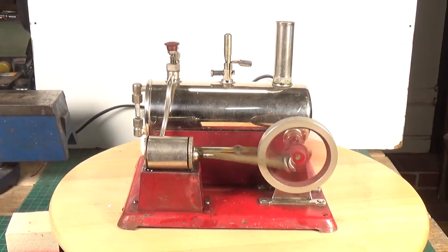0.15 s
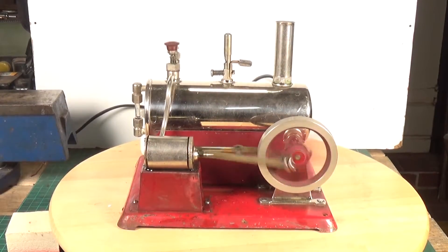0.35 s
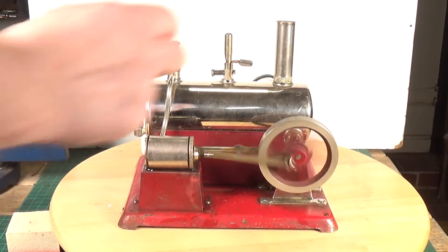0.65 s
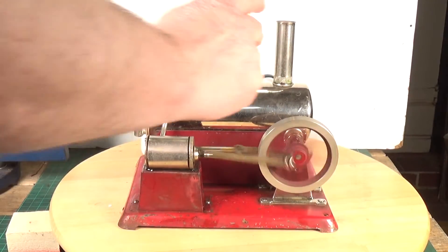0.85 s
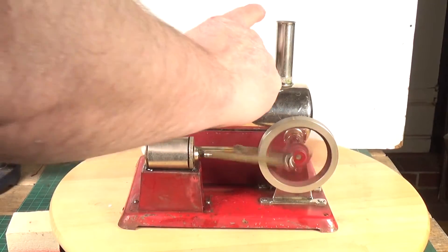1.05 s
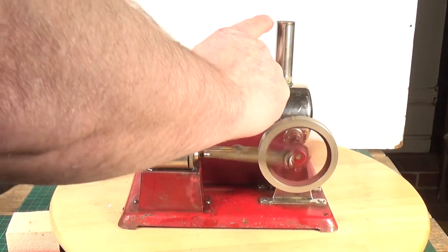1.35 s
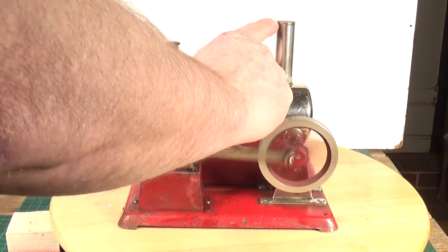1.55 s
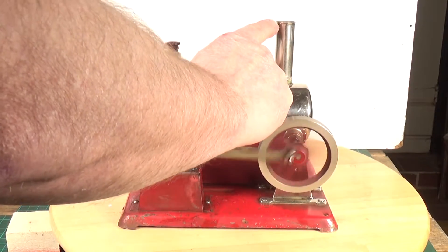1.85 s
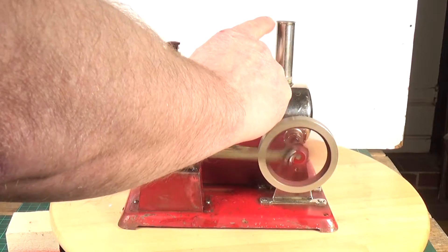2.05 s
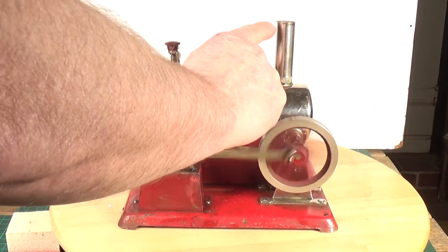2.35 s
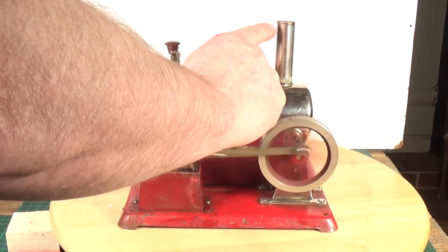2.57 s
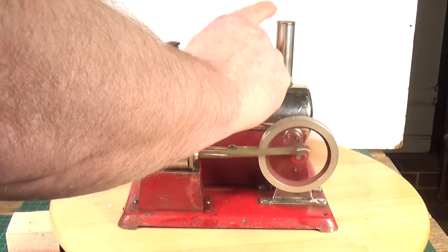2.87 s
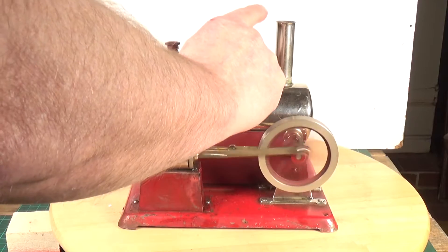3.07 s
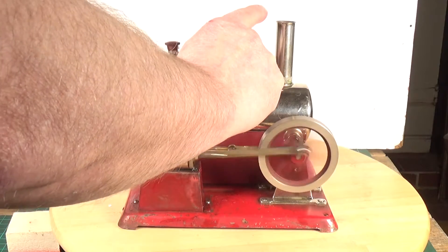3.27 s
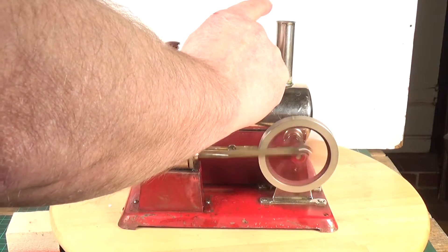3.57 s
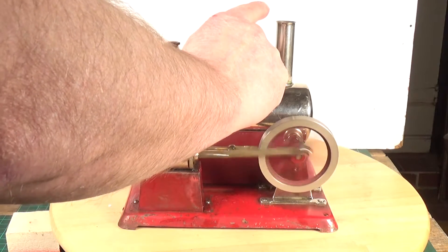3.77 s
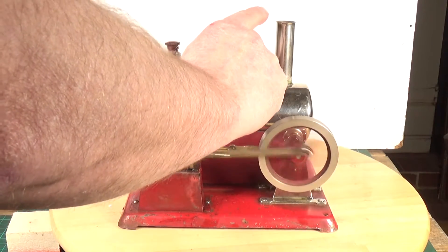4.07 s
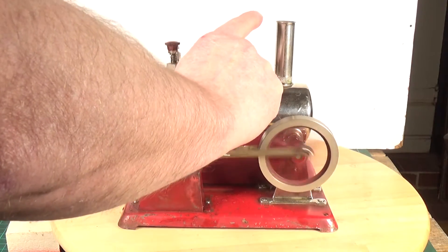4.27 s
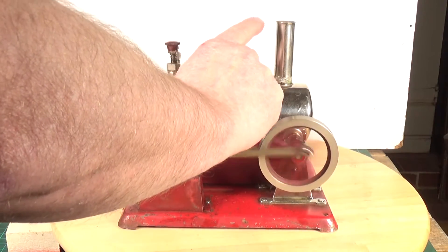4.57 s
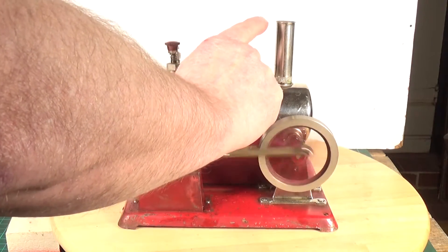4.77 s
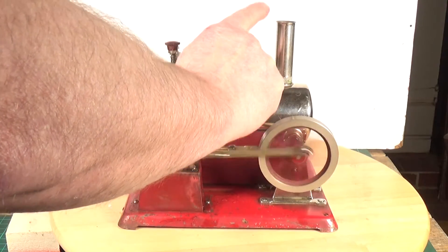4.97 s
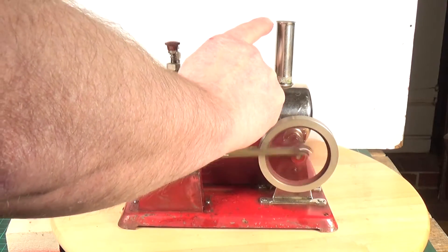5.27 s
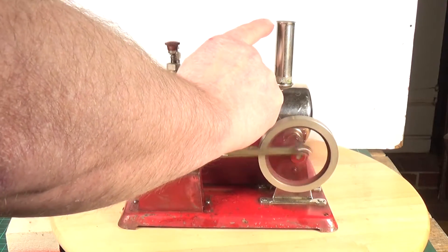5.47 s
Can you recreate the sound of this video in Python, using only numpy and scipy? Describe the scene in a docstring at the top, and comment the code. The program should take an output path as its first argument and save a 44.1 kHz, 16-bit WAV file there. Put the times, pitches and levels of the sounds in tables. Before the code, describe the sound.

A model steam engine runs close to the microphone on a wooden table in a workshop, knocking, rattling and puffing about ten times a second. At about 1.4 seconds its whistle gives a loud shrill toot, then a weaker, fluttering one. After a stretch of engine alone comes a brief hiss without tone, then another strong toot near the end.

```python
"""A small stationary steam engine runs at about ten turns a second on a wooden turntable in a workshop.
Each turn the rod knocks and bounces, the table thumps, steam puffs and the stroke reverses with a rattle.
Knocks and thumps are short pushes that set ringing parts going; puffs and whirr are coloured noise.
A hand opens the whistle valve four times: three toots, each a near sine with hissing steam, and one mere hiss."""
import sys
import numpy as np
from scipy import signal
from scipy.fft import rfft, irfft
from scipy.io import wavfile
from scipy.ndimage import uniform_filter1d, minimum_filter1d

SR = 44100
rng = np.random.default_rng(int(sys.argv[2]) if len(sys.argv) > 2 else 0)


def dump(signal):
    """Clip the signal to [-1, 1] and save it as 16-bit WAV at the path in sys.argv[1]."""
    limited = np.clip(np.atleast_2d(signal).T, -1, 1)
    pcm = np.round(limited * 32767).astype(np.int16)
    wavfile.write(sys.argv[1], SR, pcm)


def volts(x):
    """Linear amplitude factor 10**(x/20) for a level x in dB, scalar or array-like."""
    e = np.asarray(x, float) / 20
    return 10 ** e


N = 248277
T = np.arange(N) / SR

# When the rod knocks, at every fifth turn of the crank. Each entry: time in seconds.
FIFTH_KNOCKS = [0.038, 0.5389, 1.0344, 1.5305, 2.0269, 2.526, 3.0257, 3.524, 4.0204, 4.5171, 5.0187, 5.5224,
                6.026]
# How the engine frame and boiler ring. Each row: pitch in Hz, relative level in dB, time to fall 60 dB in s.
FRAME_MODES = [(461.3, -12, 0.053), (599, -6, 0.025), (703.3, -10, 0.079), (810.7, -2, 0.062),
               (894.3, -10, 0.086), (974.6, -4, 0.058), (1100, -8, 0.07), (1198, -5, 0.055),
               (1313, -12.5, 0.1), (1790, -5, 0.017), (2107, -12, 0.074), (2389, -5, 0.019),
               (2947, -18.5, 0.072), (3440, -19.5, 0.11), (4093, -22.5, 0.095), (4460, -17, 0.17)]
# How the bell-like part rings. Each row: pitch in Hz, relative level in dB, time to fall 60 dB in s.
BELL_MODES = [(1531.5, 3, 0.039), (1725, -16, 0.11)]
# How the small loose joints ring. Each row: pitch in Hz, relative level in dB, time to fall 60 dB in s.
LINK_MODES = [(4700, -3, .015), (5050, -1, .018), (5500, -3, .012), (6000, -3, .012), (6600, -4, .01),
              (7400, -6, .01)]


def colour(points, size=N):
    """Noise of rms 1 with the given spectrum: rows of Hz and dB, joined on a log pitch scale."""
    hz, db = np.transpose(points)
    f = np.fft.rfftfreq(size, 1 / SR) + 1
    shape_db = np.interp(np.log(f), np.log(hz), db, -80 + db[0], -80)
    x = irfft(rfft(rng.standard_normal(size)) * volts(shape_db), size)
    return x / x.std()


def walk(rate):
    """A smooth random wander: levels held 1 / rate s and smoothed twice, with a spread near 1."""
    hold = int(SR / rate)
    steps = np.repeat(rng.standard_normal(N // hold + 1), hold)
    return 1.46 * uniform_filter1d(uniform_filter1d(steps, hold), hold)[:N]


def dull(x, hz):
    """One-pole low-pass: takes away what is faster than hz."""
    p = np.exp(-2 * np.pi * hz / SR)
    return signal.lfilter([1 - p], [1, -p], x)


def band(x, lo_hz):
    """High-pass: small things radiate no deep bass."""
    return signal.sosfilt(signal.butter(3, lo_hz, "high", fs=SR, output="sos"), x)


def turns(lag=0., jitter=.001):
    """The moment in every turn that lies lag s after the knock, with a random jitter in s."""
    s = np.interp(np.arange(57) / 5, np.arange(len(FIFTH_KNOCKS)), FIFTH_KNOCKS)
    return s + lag + jitter * rng.standard_normal(len(s))


def uneven(s, db, scatter_db, curve=None):
    """A level for each event: the usual one, chance and, if given, a slow curve."""
    slow_db = np.interp(s, *np.transpose(curve)) if curve else 0
    return db + scatter_db * rng.standard_normal(len(s)) + slow_db


def blows(s, db):
    """One impulse for each time."""
    i = np.round(np.asarray(s) * SR).astype(int)
    ok = (i >= 0) & (i < N)
    return np.bincount(i[ok], (volts(db) * np.ones(len(i)))[ok], N)


def fade(x, t60, rise=0.00029):
    """Each impulse becomes an envelope with a quick rise and an exponential fall (both in s)."""
    p, q = np.exp(-np.log(1000) / (t60 * SR)), np.exp(-1 / (rise * SR))
    return signal.lfilter([1 - q], [1, -q], signal.lfilter([1], [1, -p], x))


def shove(s, db, push_ms):
    """Smooth pushes of a given length; a longer push sounds lower."""
    push = np.hanning(int(push_ms * SR / 1000))
    return np.convolve(blows(s, db), push / push.sum())[:N]


def ring(x, modes):
    """Damped modes struck by x, neighbours in opposite sense."""
    out = 0
    for k, (hz, db, t60) in enumerate(modes):
        r, w = np.exp(-np.log(1000) / (t60 * SR)), 2 * np.pi * hz / SR
        mode = signal.lfilter([0, r * np.sin(w)], [1, -2 * r * np.cos(w), r * r], x)
        out = out + (-1) ** k * volts(db) * mode
    return out


def chatter(spread_db):
    """Dense tiny contacts of very uneven size."""
    return rng.standard_normal(N) * volts(spread_db * rng.exponential(size=N) - spread_db)


def workshop(x, t60, wet_db):
    """Adds a diffuse room tail that builds up over its first 15 ms."""
    t = T[:SR // 2]
    tail = rng.standard_normal(len(t)) * np.exp(-np.log(1000) * t / t60) * np.clip(t / 0.015, 0, 1)
    return x + volts(wet_db) * signal.fftconvolve(x, tail / np.sqrt(np.sum(tail ** 2)))[:N]


def whirr():
    """Bearings, boiler and room murmur on as coloured noise, loudest around the knock."""
    # Spectrum of the murmur. Each row: pitch in Hz, level in dB.
    murmur_spectrum = [(20, -33), (55, -4.5), (80, -38), (100, -4), (190, -8.5), (232, 1), (400, -4.5),
                       (990, 0), (1400, -0.5), (1930, -7), (2770, -13), (6570, -13.5), (10800, -18.5),
                       (15600, -35)]
    turn_count = 5 * np.interp(T, FIFTH_KNOCKS, np.arange(len(FIFTH_KNOCKS)))
    load_db = 2.5 * np.cos(2 * np.pi * turn_count)
    return colour(murmur_spectrum) * volts(-39.5 + load_db + 1.2 * walk(29.69))


def jet():
    """Steam hisses from the open valve and breathes through the whistle mouth."""
    # Spectrum of the hiss. Each row: pitch in Hz, level in dB.
    hiss_spectrum = [(1500, -11.5), (3000, -1.5), (4800, -0.5), (5350, 2.5), (5800, -3), (8000, -10.5),
                     (9400, -2), (9900, -3), (10900, 2.5), (12200, -3), (13600, -6), (14350, -6),
                     (14900, -9), (15750, -10)]
    # Spectrum of the breath in the whistle mouth. Each row: pitch in Hz, level in dB.
    mouth_spectrum = [(2300, -30), (3020, -15), (3240, 0), (3380, -4), (3520, 0), (3850, -7), (4070, -4),
                      (4350, -15), (5000, -22), (5380, -13), (5800, -24)]
    # The four valve openings. Each row: opens in s, starts to shut in s, hiss level in dB,
    # mouth level in dB, change of the mouth level while open in dB, opening time in s.
    valve = [(1.44, 2.09, -33, -32.5, -10, 0.019), (2.346, 2.829, -38.5, -34.5, 3.5, 0.016),
             (4.581, 4.987, -41.5, -37, 5.5, 0.03), (5.242, 5.704, -33.5, -27.5, -13, 0.023)]
    hiss = colour(hiss_spectrum) * volts(1.4 * walk(25))
    mouth = colour(mouth_spectrum) * volts(2.0 * walk(150))
    out = 0
    for opens, shuts, hiss_db, mouth_db, swell_db, open_s in valve:
        flow = np.clip(np.minimum((T - opens) / open_s, (shuts - T) / 0.033 + 1), 0, 1)
        progress = np.clip((T - opens) / (shuts - opens), 0, 1)
        breath = volts(mouth_db + swell_db * progress) * mouth
        out = out + flow * (volts(hiss_db) * hiss + breath)
    return out


def whistle():
    """A near sine with faint overtones; the unsteady jet shakes its pitch and size, most in toot two."""
    # Course of each toot, one list per toot. Each row: time in s, pitch in Hz, level in dB.
    toots = [
        [(1.451, 3390, -29), (1.459, 3347, -17), (1.481, 3552, -1.5), (1.513, 3562, -5.5), (1.733, 3598, -3.5),
         (2.0, 3574, -7.5), (2.094, 3597, -1), (2.102, 3370, -19), (2.112, 3330, -30)],
        [(2.358, 3250, -32), (2.372, 3368, -17), (2.418, 3433, -11), (2.444, 3442, -22), (2.456, 3430, -17.5),
         (2.612, 3483, -18), (2.828, 3428, -23.5), (2.842, 3390, -32.5), (2.94, 3410, -42)],
        [(5.252, 3471, -55), (5.26, 3456, -16.5), (5.272, 3533, -7), (5.3, 3560, -6.5), (5.466, 3557, -4.5),
         (5.48, 3558, -13), (5.492, 3568, -4), (5.63, 3537, -4.5)],
    ]
    # Unsteadiness, one row per toot: share of noisy jet from 0 to 1, its flutter per s, overtone level in dB.
    roughness = [(.18, 110, 0), (.45, 260, 3), (.18, 100, -5)]
    # Overtones. Each row: multiple of the pitch, relative level in dB.
    overtones = [(2, -34), (3, -35.5), (4, -62)]
    out = np.zeros(N)
    for toot, (rough, flutter, shrill_db) in zip(toots, roughness):
        s, hz, db = np.transpose(toot)
        rough = np.clip(rough, 0, 1) * np.clip((T - s[0]) / 0.05, 0, 1)  # it speaks cleanly at first
        # a complex number shakes size and phase together
        shake = (walk(flutter) + 1j * walk(flutter)) / np.sqrt(2)
        swing = np.sqrt(1 - rough ** 2) + rough * shake
        swing = swing + volts(-23) * (walk(540) + 1j * walk(500))
        pitch_hz = np.interp(T, s, hz) + 4.93 * walk(60)
        spin = np.exp(2j * np.pi * np.cumsum(pitch_hz) / SR)
        shrill = 0
        for multiple, overtone_db in overtones:
            overtone = (spin * swing / abs(swing)) ** multiple
            shrill = shrill + volts(overtone_db + shrill_db + 2.2 * walk(60)) * overtone
        wave = swing * spin + np.clip((T - s[0]) / .07, 0, 1) ** 2 * shrill  # overtones come in later
        level = uniform_filter1d(volts(np.interp(T, s, db, -120, -120)), size=130)
        out += np.sqrt(2) * level * wave.real
    return out


def puffs():
    """A gust of steam opens in about a ms and dies away, with a lower, wetter part; a thin squeak follows."""
    # Spectrum of the dry gust. Each row: pitch in Hz, level in dB.
    gust_spectrum = [(4000, -27), (6000, 3.5), (7500, -1), (9200, 2.5), (11000, 0), (13000, -4.5),
                     (15500, -8)]
    # Spectrum of the wetter part. Each row: pitch in Hz, level in dB.
    wet_spectrum = [(4000, -29), (5300, -7), (6300, -7), (8000, -13), (15500, -37)]
    # Slow change of the squeak. Each row: time in s, change in dB.
    squeak_curve = [(0, 4), (.6, -2.5), (1.199, -4), (2.3, -25), (3.698, -9), (4.399, -4), (5.0, -15),
                    (5.6, 3)]
    s = turns(lag=0.0446, jitter=0.00061)
    hiss_db = uneven(s, db=-43.5, scatter_db=1.3)
    squeak_db = uneven(s, db=-43.5, scatter_db=2.2, curve=squeak_curve)
    gust = fade(blows(s, hiss_db + 6), 0.093, rise=0.0012)
    gust = gust + fade(blows(s, hiss_db - 14.5), 0.48, rise=0.0026)  # faint long remainder
    wet_db = hiss_db + 4 + 2.8 * rng.standard_normal(len(s))
    wet = fade(blows(s, wet_db), 0.056, rise=0.0011)
    squeak_hz = 11050 + 200 * walk(40)
    squeak = fade(blows(s + 0.0067, squeak_db + 4.0), 0.087, rise=0.0024) * volts(5.0 * walk(330))
    squeak = squeak * np.sin(2 * np.pi * np.cumsum(squeak_hz) / SR)
    return gust * colour(gust_spectrum) + wet * colour(wet_spectrum) + squeak


def table():
    """The out-of-balance crank thumps the table near the same points of every turn, and its modes ring."""
    # How the table rings. Each row: pitch in Hz, relative level in dB, time to fall 60 dB in s.
    table_modes = [(111.5, -14.5, 0.057), (140, -12.5, 0.056), (229, 1.5, 0.084), (276.6, 1.5, 0.07),
                   (331, -8.5, 0.025)]
    # The thumps of one turn. Each row: s after the knock, relative level in dB, length of the push in ms.
    thumps = [(-.032, 0, 4.3), (-.016, -3, 4), (.0, -2, 0.86), (.007, 1.5, 1.7), (.021, 1, 0.65),
              (.043, -9.5, 1.2)]
    # Slow course of the thumps. Each row: time in s, relative level in dB.
    thump_curve = [(0, -43.5), (.4, -43.5), (0.552, -40.5), (1.499, -40), (2.2, -41), (2.6, -43.5),
                   (3.2, -41.5), (3.6, -40.5), (4.402, -41.5), (5.2, -42.5), (5.6, -42)]
    # Slow change of the deep shove. Each row: time in s, change in dB.
    jolt_curve = [(0, -1), (2.0, 0.5), (3.5, 5.5), (4.4, -1.5), (5.599, 0.5)]
    s = turns(jitter=0.00041)
    thump_db = uneven(s, db=0, scatter_db=1.34, curve=thump_curve)
    force = 0
    for lag, rel_db, push_ms in thumps:
        scatter_db = 1.3 * rng.standard_normal(len(s))
        force = force + shove(s + lag, thump_db + rel_db + scatter_db, push_ms)
    # one deep slow shove per turn
    jolt_db = uneven(s, db=-26.5, scatter_db=1.0, curve=jolt_curve)
    force = force + shove(s + 0.00542, jolt_db, push_ms=8.28)
    return band(ring(force, table_modes), lo_hz=97.0) * volts(4.0)


def reversal():
    """Slack is taken up: a sharp tick, a rattle through the frame, then the valve gear clicks."""
    # The slack rod slaps again after the reversal. Each row: delay in s, relative level in dB.
    slaps = [(.008, -2.5), (.016, -8), (.023, -3)]
    # Slow change of tick and gear click alike. Each row: time in s, change in dB.
    ticks_curve = [(0, -1.5), (1.45, 1.5), (2.1, -2), (2.6, 0), (3.001, -2.5), (4.3, -7.5), (4.75, -11),
                   (5.201, -0.5), (5.6, -5)]
    s = turns(lag=-.0305, jitter=0.001005)  # shortly before the knock
    frame_db = uneven(s, db=-34, scatter_db=2.3)
    tick_db = uneven(s, db=-37.5, scatter_db=4, curve=ticks_curve)
    gear_db = uneven(s, db=-38.5, scatter_db=3.4, curve=ticks_curve)
    rattle = fade(blows(s, frame_db - 24), 0.25) * chatter(1.93)
    rattle = rattle + blows(s, frame_db - 0.5)
    for lag, db in slaps:
        slap_s = s + lag + 0.001008 * rng.standard_normal(len(s))
        rattle = rattle + blows(slap_s, uneven(s, db, 2.9) + frame_db)
    tick = fade(blows(s, tick_db - 17.5), 0.055)
    gear_click = fade(blows(s + 0.0202, gear_db - 18.5), 0.028)
    ticks = (tick + gear_click) * chatter(2.3)
    ringing = ring(rattle, FRAME_MODES) + volts(-7.0) * ring(rattle, BELL_MODES) + ring(ticks, LINK_MODES)
    return ringing + volts(-3.5) * dull(rattle, 2500.) + volts(18.5) * dull(ticks, 7000.)


def rod():
    """The knock and its bounce ring the bell-like part and the frame; loose joints chatter after it."""
    # Ring of the bell-like part, damped as the arm reaches over the engine.
    # Each row: time in s, relative level in dB.
    bell_curve = [(0, -28.5), (.75, -26.5), (.95, -29), (1.021, -37), (1.248, -37), (1.32, -31),
                  (2.2, -30.5), (3.7, -31.5), (5.6, -33)]
    # Knocks at which the bell-like part hardly rings. Each row: number of the turn from 0, change in dB.
    dead_knocks = [(16, -10), (20, -12), (43, -17), (49, -17)]
    s = turns(jitter=0.000904)
    bell_db = uneven(s, db=0, scatter_db=1.5, curve=bell_curve)
    frame_db = uneven(s, db=-29.5, scatter_db=1.26)
    for turn, db in dead_knocks:
        bell_db[turn] += db
    bounce_s = s + .008 + 0.00047 * rng.standard_normal(len(s))
    chance = rng.standard_normal(len(s))  # size of the bounce, shared by bell and frame
    strike = blows(s, bell_db + 6) + blows(bounce_s, bell_db - 1 + 3 * chance)
    push = fade(blows(s, frame_db - 19) + blows(bounce_s, frame_db - 23.5), 0.02)
    push = push + fade(blows(s, frame_db - 41.5), 0.2)
    push = push * chatter(1.6)
    push = push + blows(s, frame_db - 17.0) - blows(bounce_s, frame_db - 8 + 3.4 * chance)
    ringing = ring(strike, BELL_MODES) + ring(push, FRAME_MODES) + volts(-7.0) * ring(push, LINK_MODES)
    return ringing + volts(14.5) * dull(push, 3300.0)


def scene():
    """Engine and whistle in the room; the whistle stands high enough to echo from the far walls."""
    # Single echoes of the whistle. Each row: delay in s, level in dB.
    echo_rows = [(.0271, -22), (.05, -25), (.0652, -17), (.085, -27), (.112, -31)]
    blown = whistle() + jet()
    echoes = sum(volts(db) * np.pad(blown, (int(s * SR), 0))[:N] for s, db in echo_rows)
    blown_in_room = workshop(blown, t60=.5, wet_db=-28) + echoes
    engine = band(rod() + reversal(), lo_hz=280.) + puffs()
    engine_in_room = workshop(engine, t60=.32, wet_db=-13)
    return (engine_in_room + table() + whirr() + blown_in_room)[None]


def roll_off(x):
    """The treble ends steeply here."""
    return signal.sosfilt(signal.butter(12, 15730, fs=SR, output="sos"), x)


def record(dry):
    """Gain control ducks at loud sound, waits and creeps back; a quick limiter then holds down the peaks."""
    hold_db, hold_share = -17, 0.34  # above this level, takes back this share of the excess
    wait = SR * 6 // 10 + 1  # samples before the gain climbs again
    recover_db_per_s = 2
    over_db = np.maximum(10 * np.log10(dull(dry ** 2, 3.7) + 1e-12) - hold_db, 0)
    # the lowest gain of the past 0.6 s holds
    held_db = minimum_filter1d(-hold_share * over_db, size=wait, origin=(wait - 1) // 2, mode="nearest")
    climb = recover_db_per_s * T
    gain_db = np.minimum.accumulate(held_db - climb, axis=1) + climb
    ducked = dry * volts(dull(gain_db, 34.0))
    peak = -minimum_filter1d(-abs(ducked), size=45)  # largest sample within about 1 ms
    limit = np.minimum(1, volts(-3.5) / (peak + 1e-9)) ** 1.3
    return roll_off(ducked * uniform_filter1d(limit, size=45))


dry = scene()
out = record(dry)
dump(out)
```